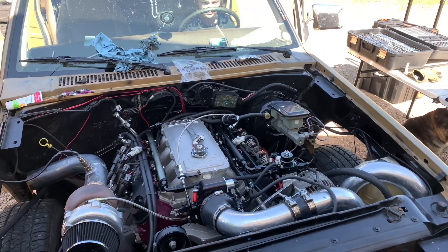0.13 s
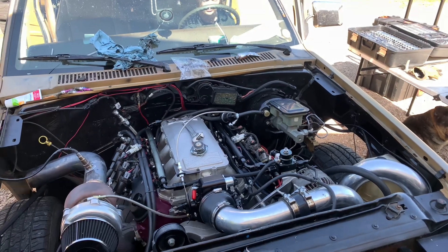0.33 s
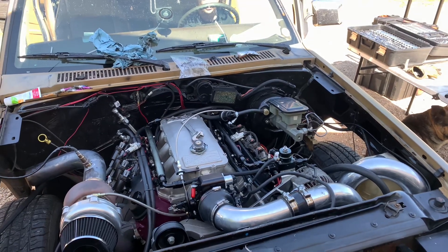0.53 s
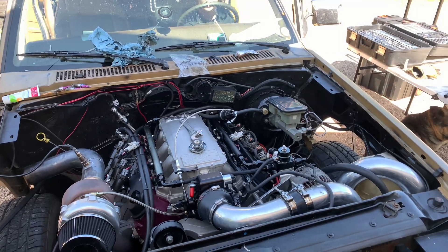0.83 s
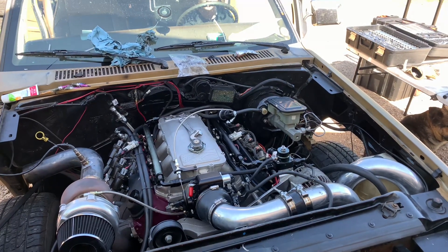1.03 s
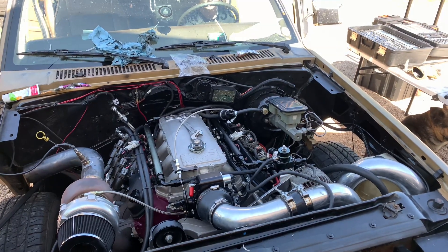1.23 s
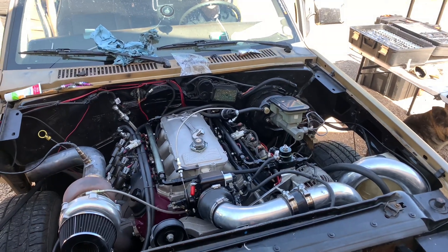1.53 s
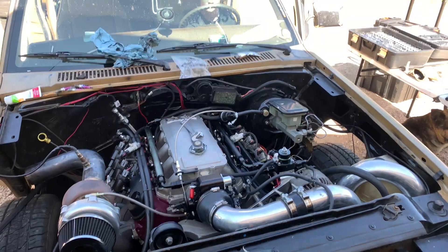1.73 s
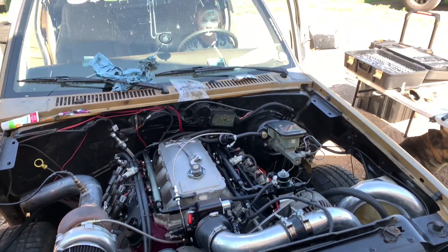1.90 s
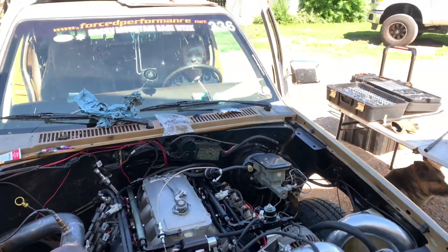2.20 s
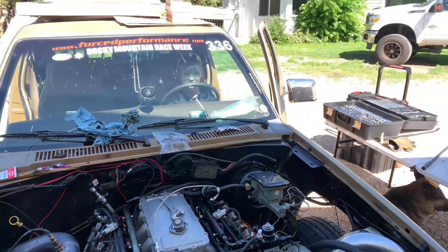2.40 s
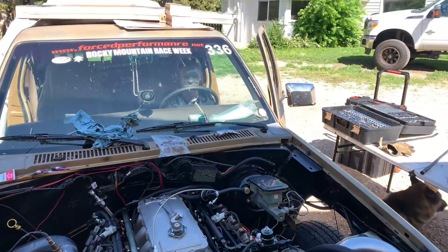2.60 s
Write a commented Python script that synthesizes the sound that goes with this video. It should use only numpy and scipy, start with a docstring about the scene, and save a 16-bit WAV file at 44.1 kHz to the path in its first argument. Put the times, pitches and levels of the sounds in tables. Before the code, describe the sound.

A car V8 engine starts outdoors, heard close at the open engine bay in stereo. Quiet, rough starter noise lasts about 0.2 s, then the engine catches with bright metallic clatter and a deep exhaust flare. Revs fall quickly until about 0.9 s. From 1 s to the end near 2.75 s it holds a lumpy, throbbing idle, with raspy puffs, valve ticks and soft intake hiss.

```python
"""A V8 engine heard from the open engine bay: the exhaust flares as it catches, then settles to a lumpy idle.
Firing pulses ring low pipe resonances, noisy puffs rasp in resonances from low to high, harder pulses bark.
Valves tick in intake hiss over ringing metal, and the catch brings a burst of bright clatter.
Brief starter noise with small random swells opens the scene. Two microphone ports hear it all in stereo."""
import sys
import numpy as np
from scipy import signal
from scipy.fft import rfft, irfft
from scipy.io import wavfile
from scipy.ndimage import uniform_filter1d

SR = 44100
rng = np.random.default_rng(int(sys.argv[2]) if len(sys.argv) > 2 else 0)


def put_to_file(sound):
    """Save the sound as 16-bit audio at rate SR, in the file named by the first command-line argument."""
    columns = np.atleast_2d(sound).T  # one column per channel
    safe = np.clip(columns, -1, 1)
    whole_steps = np.round(safe * 32767)
    wavfile.write(sys.argv[1], SR, whole_steps.astype(np.int16))


N = 121275
T = np.arange(N) / SR
FFT_SIZE = N + N % 2 + 8192  # padded so that filter tails do not wrap around
HZ = np.fft.rfftfreq(FFT_SIZE, 1 / SR)


def amp(db):
    """Gain from dB."""
    return 10 ** (np.asarray(db) / 20)


def evened(x):
    """Scales to rms 1."""
    return x / np.sqrt(np.mean(x ** 2) + 1e-20)


def curve(table, column=1):
    """One column of a table drawn along time."""
    return np.interp(T, *np.transpose(table)[[0, column]])


def read(points):
    """A table drawn over log frequency."""
    hz, value = np.transpose(points)
    return np.interp(np.log(HZ + 1), np.log(hz), value)


def coloured(x, points):
    """Filters x by a spectrum table, rms 1."""
    spectrum = rfft(x, FFT_SIZE) * amp(read(points))
    return evened(irfft(spectrum)[..., :N])


def resonate(x, hz, width_hz):
    """A one-mode resonance with a peak gain near 1."""
    pole = np.exp((2j * hz - width_hz) * np.pi / SR)
    return 2 * signal.lfilter([1 - abs(pole)], [1, -pole], x).real


def steep(x, hz, width_hz, wider):
    """Two resonances in series, the first one wider, scaled down for wide modes."""
    return resonate(resonate(x, hz, wider * width_hz), hz, width_hz) / np.sqrt(width_hz)


def dying(clicks, seconds):
    """Each click becomes an exponentially falling envelope."""
    return signal.lfilter([1], [1, -np.exp(-1 / (seconds * SR))], clicks)


# engine speed: start_s [s], speed [engine cycles per s]
ENGINE_SPEED = [(.2, 22.65), (.3, 20.36), (.4, 18.19), (.5, 16.6), (.6, 14.9), (.68, 14.33), (.76, 14.19),
                (.84, 13.02), (.9, 12.27), (1, 12.45), (1.1, 12.0), (1.3, 12.03), (1.5, 12.78),
                (1.7, 12.73), (2.0, 12.47), (2.3, 12.37), (2.75, 12.3)]
START_TURN = .395  # place in the cycle at time zero, turns
JITTER_S_PER_DB = .0003  # timing scatter for each dB of size scatter


def each_cycle(pattern, spread_db):
    """Clicks at the pattern's places in every engine cycle, each a little uneven in size and time."""
    turns = np.cumsum(curve(ENGINE_SPEED)) / SR + START_TURN
    place, db = np.transpose(pattern)
    cycles = np.arange(int(turns[-1]) + 1)[:, None]
    click_s = np.interp(cycles + place, turns, T, right=T[-1] + 1)
    luck = rng.standard_normal(click_s.shape + (2,)) * np.interp(click_s, T, spread_db)[..., None]
    late_s, size_db = JITTER_S_PER_DB * luck[..., 0], db + luck[..., 1]
    at = np.clip((click_s + late_s) * SR, 0, N).astype(int)
    return np.bincount(at.ravel(), amp(size_db).ravel(), N + 1)[:N]


# pulses reaching the tailpipe, one per cylinder: place [turns of the cycle], strength_db [dB]
FIRING_PULSES = [(0.088, -8.3), (0.183, -3.4), (0.265, 0.0), (0.471, -2.3), (0.567, -7.7), (0.699, -3.9),
                 (0.832, -1.4), (0.929, -7.1)]
# unevenness of firing: start_s [s], spread_db [dB]
FIRING_SPREAD = [(.2, 1.2), (.9, 1), (1.3, .7), (1.6, .4), (2.75, .35)]
# low pipe resonances: pitch_hz [Hz], width_hz [Hz], level_db [dB], polarity [+1 or -1]
LOW_PIPE = [(48.6, 61, -12.7, 1), (68, 20, -3.2, 1), (79.1, 63, 0, -1), (96.6, 55, -4.8, 1),
            (145.4, 20, -20.8, 1), (184.7, 30, -7.4, -1), (198.2, 20, -5.6, 1), (227.5, 24, -5.6, 1),
            (271.1, 81, -14.2, -1), (291.4, 31, -15.8, 1), (337.1, 20, -19.7, 1)]
# extra level of the deepest pipe resonances: start_s [s], level_db [dB]
DEEP_LEVEL = [(.15, 4), (.2, 12.5), (.3, 14.5), (.4, 11), (.55, 10), (.7, 9.5), (.85, 3.5), (1.0, 9),
              (1.4, 5)]
# extra level of the highest of the low pipe resonances: start_s [s], level_db [dB]
HIGH_LEVEL = [(.25, 3), (.35, 6.5), (.55, 4.5), (.8, 4.5), (1.0, -3), (1.6, 1.5)]
DEEP_BELOW_HZ, HIGH_ABOVE_HZ = 120, 250
# colour of the boom as the tailpipe radiates: pitch_hz [Hz], level_db [dB]
TAILPIPE_COLOUR = [(25, -23), (40, 4), (62, -2.5), (100, -1), (145, 3), (200, 3.6), (330, 5), (420, 5.5),
                   (520, 4.5), (620, -37), (1500, -60)]
# exhaust levels: start_s [s], boom_level_db [dB], rasp_level_db [dB]
EXHAUST_LEVEL = [(.17, -87, -52), (.19, -33, -84), (.22, -37, -36), (.245, -19.5, -31), (.3, -21, -32),
                 (.32, -25.5, -23), (.39, -14.5, -22.5), (.47, -16.5, -28), (.55, -16, -28.5),
                 (.62, -13.5, -28), (.68, -16.5, -31.5), (.77, -17.5, -31.5), (.85, -12, -29.5),
                 (.93, -12.5, -29), (1.0, -15.5, -30.5), (1.25, -13.5, -28.5), (1.5, -12, -29),
                 (2.0, -13, -31), (2.75, -13.5, -31)]


def exhaust_boom():
    """Firing pulses ring the low pipe resonances, and the tailpipe colours what it radiates."""
    fire = each_cycle(FIRING_PULSES, curve(FIRING_SPREAD))
    deep, high = amp(curve(DEEP_LEVEL)), amp(curve(HIGH_LEVEL))
    boom = np.zeros(N)
    for hz, width_hz, db, polarity in LOW_PIPE:
        swell = deep if hz < DEEP_BELOW_HZ else high if hz > HIGH_ABOVE_HZ else 1
        boom += polarity * amp(db) * resonate(fire, hz, width_hz) * swell
    return amp(curve(EXHAUST_LEVEL)) * coloured(boom, TAILPIPE_COLOUR)


# turbulent puffs in the pipe: place [turns of the cycle], strength_db [dB]
TURBULENT_PUFFS = [(0.0, 2), (.19, -1), (.36, -0.5), (.55, 4.5), (.66, -1), (.78, -2)]
PUFF_DECAY_S, PUFF_SPREAD_DB = 0.006, 2.2
STEADY_FLOW = 0.4  # constant noise under puffs of rms 1
# pipe resonances from low to high, rung by noisy puffs: pitch_hz [Hz], width_hz [Hz], level_db [dB]
RASP_RESONANCES = [(141.5, 31.5, 8.5), (320, 27, -0.5), (825, 97, -7.5), (1127, 45, 0.5), (1367, 176, 5.5),
                   (1843, 45, -3), (1969, 22.6, -3.5), (2432, 143, 1.5), (3214, 60, -8), (4117, 370, -4)]


def exhaust_rasp():
    """Turbulent flow noise swells in puffs every cycle and rings pipe resonances from low to high."""
    puffs = evened(dying(each_cycle(TURBULENT_PUFFS, np.full(N, PUFF_SPREAD_DB)), PUFF_DECAY_S))
    flow = (STEADY_FLOW + puffs) * rng.standard_normal((2, N))
    rasp = sum(amp(db) * steep(flow, hz, width_hz, wider=2) for hz, width_hz, db in RASP_RESONANCES)
    return amp(curve(EXHAUST_LEVEL, column=2)) * evened(rasp)


def ringing(fire, modes):
    """Pulses through steep resonances, rms 1."""
    return evened(sum(amp(db) * steep(fire, hz, width_hz, wider=3) for hz, width_hz, db in modes))


# sharper barks: place [turns of the cycle], middle_pipe_db [dB], header_db [dB]
BARK_PULSES = [(.1, -6, -1), (.36, -5, -4), (.68, -9, 0), (.8, 0, -7), (.93, -11, -9)]
# middle pipe resonances: pitch_hz [Hz], width_hz [Hz], level_db [dB]
MIDDLE_PIPE = [(365, 31, -13), (465.7, 35.2, 2.5), (517.4, 19.3, 0.5)]
# header tube resonances: pitch_hz [Hz], width_hz [Hz], level_db [dB]
HEADER_TUBES = [(785.5, 43, -3.5), (848, 31, -5)]
# level of the middle pipe part, which the header part follows: start_s [s], level_db [dB]
BARK_CURVE = [(.2, -50), (.3, -27.5), (.5, -24), (.68, -28), (.76, -35), (.85, -30), (1.0, -29),
              (1.25, -33), (1.6, -30), (2.1, -31), (2.75, -31.5)]
HEADER_DB, BARK_SPREAD_DB = -9, 1.2  # header against middle pipe; scatter in strength


def barks():
    """Some pulses crack harder and ring the middle pipe resonances and the header tubes."""
    pulses, spread_db = np.array(BARK_PULSES), np.full(N, BARK_SPREAD_DB)
    middle = ringing(each_cycle(pulses[:, [0, 1]], spread_db), MIDDLE_PIPE)
    header = ringing(each_cycle(pulses[:, [0, 2]], spread_db), HEADER_TUBES)
    return amp(curve(BARK_CURVE)) * (middle + amp(HEADER_DB) * header)


# ringing metal parts: pitch_hz [Hz], width_hz [Hz], level_db [dB]
METAL_PARTS = [(1403, 37, 4), (1988, 140, -3), (2538, 93, 4), (3420, 25, -3), (3975, 31, 1.5),
               (4470, 94, -0.5), (6480, 49, -7.5), (7680, 100, -1), (8100, 130, 2.5), (10750, 190, 1),
               (11400, 200, -10)]
KNOCKS_PER_S, KNOCK_SPREAD_DB = 800, 3.5


def rattle(drive):
    """Small random knocks, stronger with the drive, each ringing one metal part."""
    size_db = KNOCK_SPREAD_DB * np.minimum(rng.exponential(size=N), 4)
    knocks = drive * (rng.random((2, N)) < KNOCKS_PER_S / SR) * amp(size_db)
    part = rng.integers(0, len(METAL_PARTS), N)
    ring = 0
    for k, (hz, width_hz, db) in enumerate(METAL_PARTS):
        ring = ring + amp(db) * resonate(knocks * (part == k), hz, width_hz) / np.sqrt(width_hz)
    return evened(ring)


# valve ticks: place [turns of the cycle], strength_db [dB]
VALVE_TICKS = [(.02, 1), (.19, 12.5), (.37, -3), (.57, -7.5), (.67, -39), (.77, 10.5)]
TICK_DECAY_S, TICK_SPREAD_DB = 0.009, 4
HISS_DB, RATTLE_DB = 9, -5.5  # steady hiss on the tick scale; rattle against ticks and hiss together
# level of ticks and intake hiss, which the rattle follows: start_s [s], level_db [dB]
VALVE_GEAR_LEVEL = [(0.15, -32), (0.18, -33), (0.2, -26.5), (0.21, -35), (0.23, -18.5), (0.33, -22),
                    (0.74, -33), (0.78, -39.5), (0.8, -28.5), (0.85, -37), (0.87, -30), (0.97, -33.5),
                    (1.02, -40), (1.02, -32.5), (2.48, -33), (2.75, -33.5)]
# colour of ticks and hiss: pitch_hz [Hz], density_db [dB per Hz]
VALVE_GEAR_COLOUR = [(500, -4.5), (660, -25), (900, 1), (1300, -6), (1620, -5), (2000, -3.5), (3000, -2),
                     (4300, -4.5), (5600, -7), (7000, -2), (8700, 0.5), (10500, -1.5), (12400, 1.5),
                     (13400, -11), (14500, -16.5), (15900, -4.5)]


def valve_gear():
    """Short noisy ticks at fixed places in the cycle over intake hiss, with a metallic rattle."""
    clicks = each_cycle(VALVE_TICKS, np.full(N, TICK_SPREAD_DB))
    envelope = uniform_filter1d(dying(clicks, TICK_DECAY_S), size=220) + amp(HISS_DB)
    hiss = coloured(envelope * rng.standard_normal((2, N)), VALVE_GEAR_COLOUR)
    fade_in = np.clip((T - VALVE_GEAR_LEVEL[0][0]) / 0.015, 0, 1)
    return amp(curve(VALVE_GEAR_LEVEL)) * fade_in * (hiss + amp(RATTLE_DB) * rattle(envelope))


# clatter as the engine catches: start_s [s], strength_db [dB] before the attack is smoothed
CLATTER_HITS = [(.207, -13), (0.21, -11.5), (0.22, -8.5), (0.236, -17), (0.262, -19), (0.279, -18),
                (0.291, -14), (0.308, -13.5), (.318, -38), (.366, -30), (.395, -19), (.411, -37),
                (0.539, -18), (0.598, -20), (0.659, -21), (0.727, -24)]
CLATTER_DECAY_S = 0.0068
# colour of the clatter: pitch_hz [Hz], density_db [dB per Hz]
CLATTER_SPECTRUM = [(600, 0), (1300, -37), (2400, 5), (4300, -23), (5700, 2.5), (7000, -11), (8700, 5.5),
                    (11000, 9), (12500, 8), (13500, -4), (16000, 3)]


def clatter():
    """Bright bursts of noise and ringing metal as the engine catches, with a few more after."""
    start_s, db = np.transpose(CLATTER_HITS)
    hits = dying(np.bincount((start_s * SR).astype(int), amp(db), N), CLATTER_DECAY_S)
    noise = coloured(rng.standard_normal((2, N)), CLATTER_SPECTRUM)
    return uniform_filter1d(hits, size=90) * (noise + amp(-9) * rattle(1))


# starter noise: start_s [s], level_db [dB]
STARTER_LEVEL = [(0.0, -34), (0.02, -35), (0.04, -23.5), (0.06, -26.5), (0.075, -32), (.1, -35.5),
                 (0.13, -28.5), (0.15, -34), (0.176, -39), (0.2, -65)]
# colour of the starter noise: pitch_hz [Hz], density_db [dB per Hz]
STARTER_SPECTRUM = [(40, -12), (65, -1), (120, -13), (180, 0.5), (330, -14), (470, -6), (675, -1.5),
                    (800, -12.5), (1100, 2.5), (1900, -6.5), (2470, -5.5), (3300, -5.5), (5500, -9),
                    (8500, -7), (12500, -12.5), (13500, -33), (16000, -33)]
ROUGH_SWELLS_PER_S, SWELL_SHARE = 110, 0.11  # average rate; depth of the swells


def starter():
    """Starter noise, roughened by randomly timed small swells, rises and falls until it fades out."""
    swells = evened(dying(rng.random(N) < ROUGH_SWELLS_PER_S / SR, 0.0025))
    rough = rng.standard_normal((2, N)) * (1 + SWELL_SHARE * swells)
    fade_out = np.clip((STARTER_LEVEL[-1][0] + 0.033 - T) / 0.012, 0, 1)
    return amp(curve(STARTER_LEVEL)) * fade_out * coloured(rough, STARTER_SPECTRUM)


# phase between the microphone ports: pitch_hz [Hz], left_lead [radians]
LEFT_LEAD = [(45, -.8), (85, -.5), (130, .2), (200, 1.3), (300, 2.6), (400, 3.6), (450, 4.3), (550, 3.8),
             (750, 5.3), (1000, 8.6), (1200, 10.3), (1300, 7.5), (1800, 11.5), (2000, 12.3), (2500, 11.3),
             (4000, 12.7), (5400, 15), (7150, 11.2), (8600, 9.42), (10400, 6.9), (13400, 3.14), (15200, 0)]
# left-right likeness of all but boom and barks: pitch_hz [Hz], likeness [0 to 1]
LIKENESS = [(300, 0.81), (700, 0.71), (1500, 0.88), (2500, 0.74), (4000, 0.38), (6000, 0.24), (7500, 0.84),
            (8600, 1), (10000, 1), (13400, 0.75), (16000, 1)]
# right port against left: pitch_hz [Hz], level_db [dB]
RIGHT_LEVEL = [(250, 0), (500, 1.8), (1200, .2), (3000, 1), (5500, 5), (7000, 0)]


def scene():
    """All sources reach two microphone ports with their own phase, balance and likeness."""
    low = rfft(exhaust_boom() + barks(), FFT_SIZE)
    near, other = rfft(exhaust_rasp() + valve_gear() + clatter() + starter(), FFT_SIZE)
    same = np.clip(read(LIKENESS), 0, 1)
    right = low + same * near + np.sqrt(1 - same ** 2) * other
    right = right * amp(read(RIGHT_LEVEL)) * np.exp(-1j * read(LEFT_LEAD))
    return irfft(np.array([low + near, right]))[:, :N]


CEILING, EDGE_HZ = .95, 15850  # full-scale amplitude limit; top of the band


def record(dry):
    """Peaks round off softly below the ceiling; then a low-pass filter limits the band."""
    soft = dry / (1 + (abs(dry) / CEILING) ** 6) ** (1 / 6)
    low_pass = signal.firwin(1023, EDGE_HZ, window=("kaiser", 11), fs=SR)
    return signal.oaconvolve(soft, low_pass[None], "same")


dry = scene()
out = record(dry)
put_to_file(out)
```